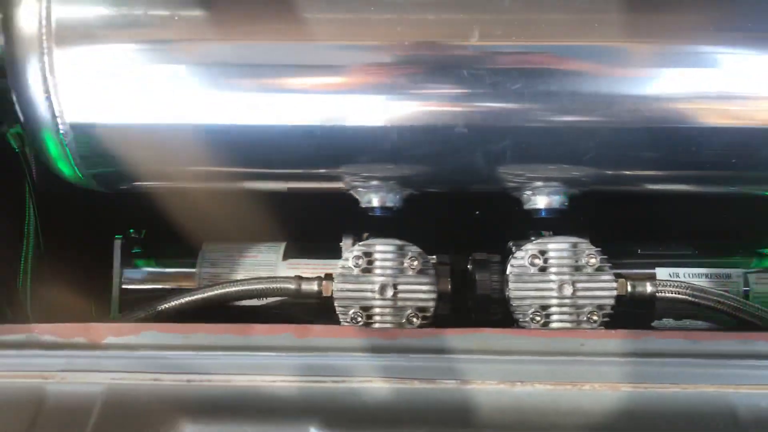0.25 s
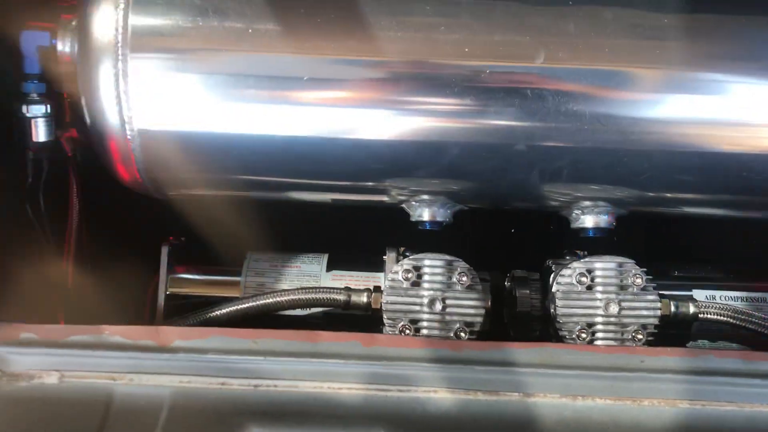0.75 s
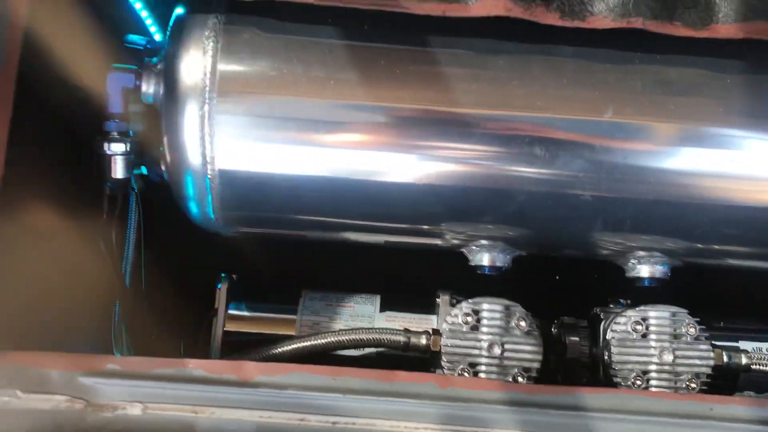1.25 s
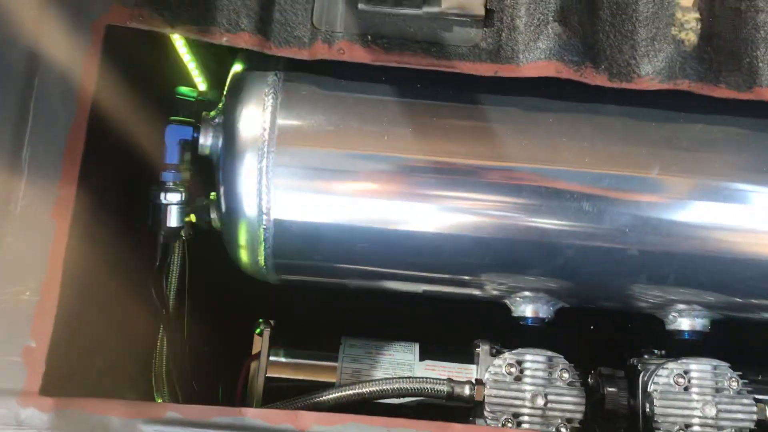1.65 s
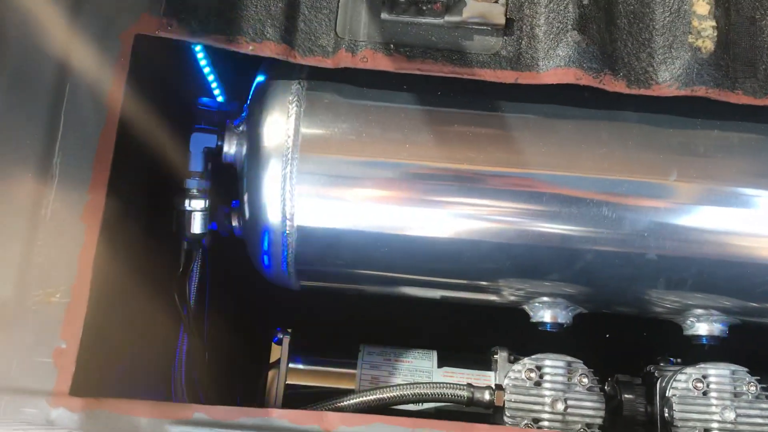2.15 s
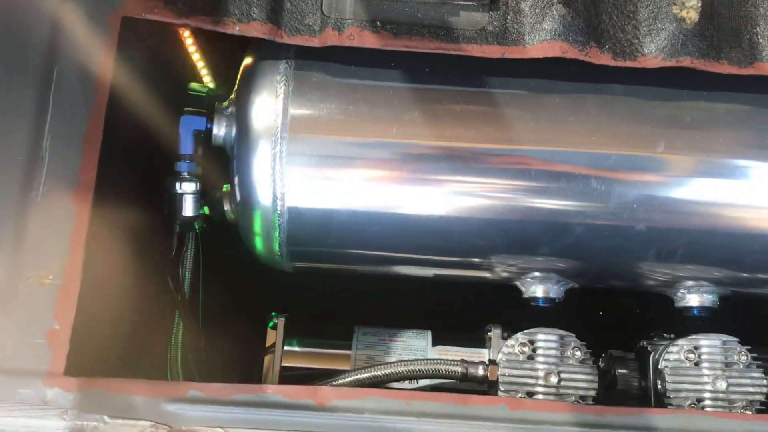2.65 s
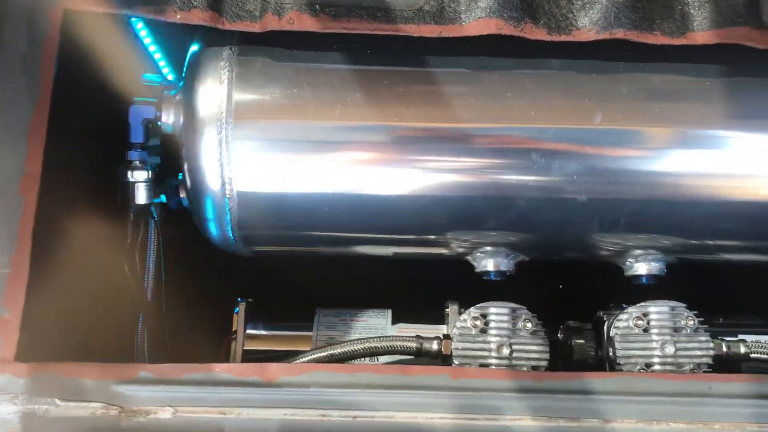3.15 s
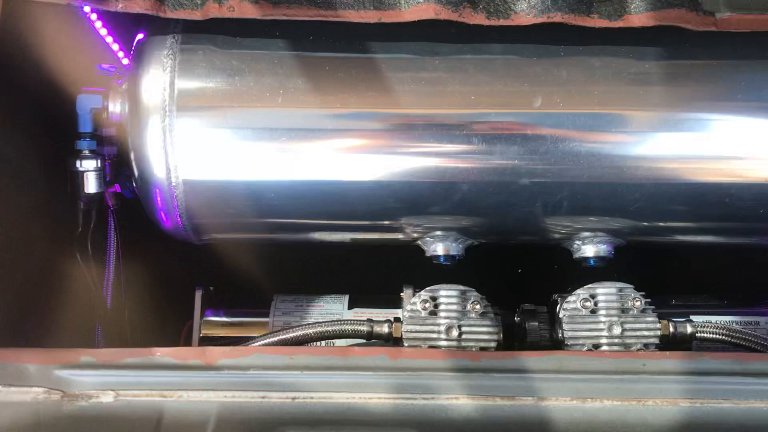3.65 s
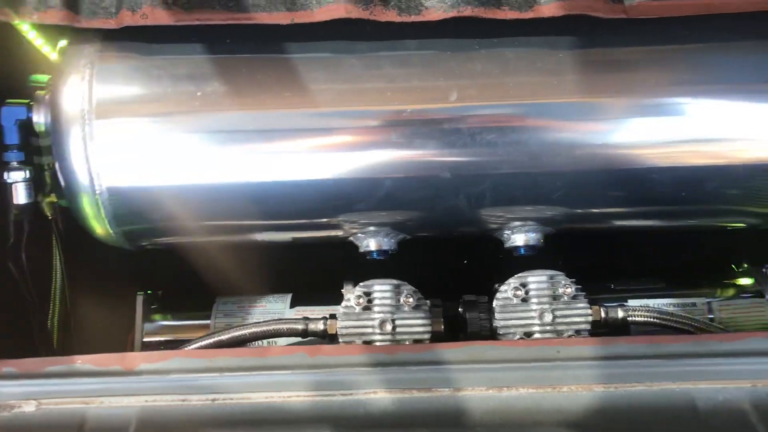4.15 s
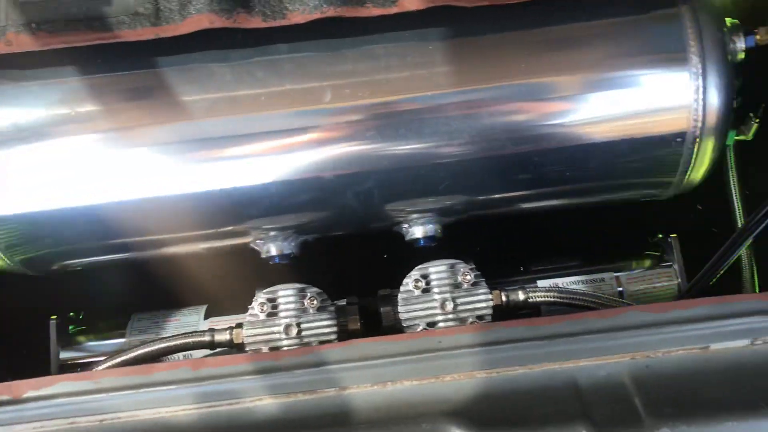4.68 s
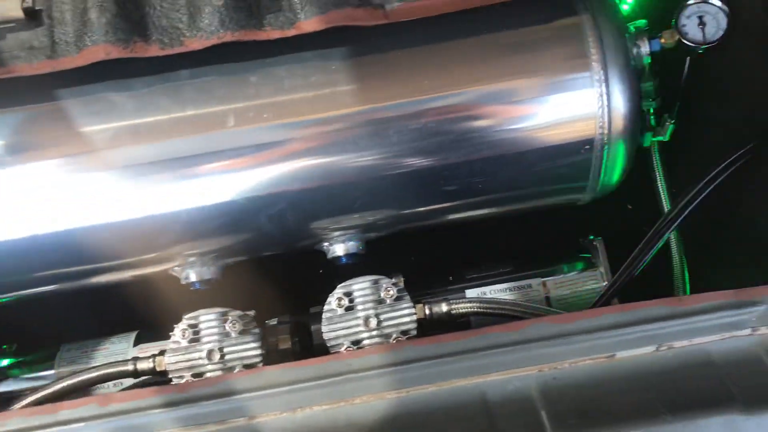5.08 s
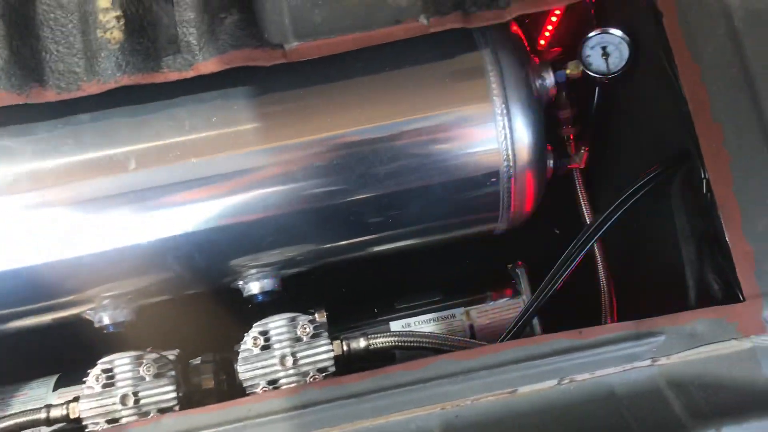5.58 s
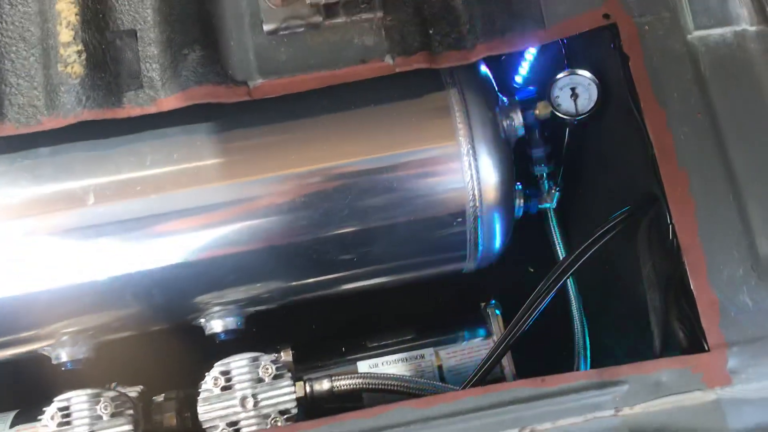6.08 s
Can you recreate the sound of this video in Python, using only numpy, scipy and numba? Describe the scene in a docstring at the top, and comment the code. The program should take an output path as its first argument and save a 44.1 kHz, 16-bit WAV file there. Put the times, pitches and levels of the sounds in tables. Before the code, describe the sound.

From 0 to about 6.3 seconds two small piston air compressors run continuously side by side in a steel well beneath a metal tank, heard closely by a hand-held microphone. A dense low hum around 110 hertz dominates, with lower and higher tones from both pumps; slightly different speeds, about 33 and 36 turns a second, make it throb and flutter several times a second. Fast knocks fuse into a hard mechanical rattle. Valve puffs and ticks add bright, metallic, ringing hiss, with thin motor and bearing whine and a loose-panel buzz. Between roughly 1 and 3 seconds some midrange tones swell slightly. Around 2.9 the bass shifts subtly, and from 3 to 4.5 the balance changes as the microphone moves to the other end. Tiny bright snaps occur near 2.2, 3.5, 4.9 and 5.0. The speed stays nearly constant and the pumps are still running at the end.

```python
"""Twin piston compressors

Two small piston air compressors run side by side in a steel well, filling a tank.
Each shaft repeats its knocks every turn, summed from sines at whole multiples of the turn rate.
Valves puff and tick as shaped noise ringing in the heads; motors and bearings whine on high orders.
The speeds differ slightly, so the hum throbs; a loose panel adds sum tones, a few valves snap.
The hand-held microphone drifts along the tank: levels shift, and single ranges swell and dip."""
import sys
import numpy as np
from numba import njit
from scipy import signal
from scipy.fft import rfft, irfft
from scipy.io import wavfile
from scipy.ndimage import uniform_filter1d

SR = 44100
rng = np.random.default_rng(int(sys.argv[2]) if len(sys.argv) > 2 else 0)


def to_wav(sig):
    """Store sig (one row per channel, or 1-D mono) as 16-bit WAV at the path in sys.argv[1].

    Samples outside -1..1 are clipped; the rate is SR.
    """
    pcm = np.clip(np.atleast_2d(sig), -1, 1) * 32767
    pcm = np.round(pcm).astype(np.int16)
    wavfile.write(sys.argv[1], SR, pcm.T)  # frames by channels


def voltage_ratio(decibels):
    """Convert decibels (scalar or array-like) to amplitude ratios, 20 dB per decade."""
    exponent = np.asarray(decibels, float) / 20
    return 10 ** exponent


N = 278702

# shaft speeds: time_s, slow_pump_rpm, fast_pump_rpm
SHAFT_SPEEDS = [(0, 1996.78, 2184.4), (1, 1998.37, 2183.69), (2, 1998.77, 2184.17), (2.8, 1997.04, 2184.66),
                (3.6, 1993.3, 2184.48), (4.4, 1992.6, 2184.41), (4.7, 1989.8, 2184.7),
                (5.4, 1991.6, 2185.66), (6.32, 1992.4, 2186.79)]
# lower shaft orders 1, 2, 3 .. at either end of the tank, before swells: left_db_rms, right_db_rms
SLOW_LOW_ORDERS = [(-48, -51), (-25.5, -27), (-35, -37.5), (-30, -27), (-37, -41), (-32.5, -31),
                   (-30, -30.5), (-34, -29), (-45.5, -44), (-46.5, -47), (-41.5, -47.5), (-38, -41),
                   (-34, -33.5), (-35.5, -33.5), (-45, -38.5), (-40.5, -40.5), (-42.5, -44), (-38.5, -47),
                   (-40, -49), (-55, -51.5), (-47, -50), (-48, -53), (-41, -56), (-47, -50.5), (-56.5, -47),
                   (-44, -49), (-69, -63), (-48, -62), (-48.5, -48), (-41, -51), (-60, -45.5), (-49, -46.5),
                   (-45.5, -52.5), (-52.5, -54), (-64, -47), (-42, -36), (-46.5, -66)]
FAST_LOW_ORDERS = [(-42, -43), (-36, -35.5), (-14.5, -16.5), (-44, -47.5), (-45, -39), (-26, -27.5),
                   (-33.5, -35), (-35.5, -36.5), (-39, -40.5), (-47.5, -61.5), (-43.5, -43), (-39, -36.5),
                   (-43, -40), (-35, -33), (-56.5, -46), (-46, -42.5), (-52, -54), (-43, -39.5), (-68, -61),
                   (-44, -47.5), (-40.5, -43), (-43, -45), (-42, -46.5), (-53, -45), (-63, -55.5),
                   (-42.5, -44.5), (-41.5, -50), (-45.5, -44)]
# slope of the weak upper orders, one table a pump: order, left_db_rms, right_db_rms
UPPER_SLOPES = [
    [(38, -61, -62), (50, -60, -58), (58, -62, -62), (70, -68, -68)],
    [(29, -54, -55), (39, -54, -52), (40, -62, -60), (48, -61, -53), (56, -63, -58), (70, -63, -64)],
]
UPPER_SPREAD_DB = 2.5  # order to order
# upper orders that fall on a resonance, one table a pump: order, left_db_rms, right_db_rms
RESONANT_ORDERS = [
    [(41, -47, -60), (46, -55, -57), (47, -55, -57), (48, -56, -53), (66, -60, -51), (67, -47, -49),
     (68, -60, -48)],
    [(37, -50, -48), (43, -55, -51), (44, -51, -49), (45, -52, -47), (47, -56, -49), (57, -47, -48),
     (61, -57, -52), (62, -54, -48)],
]
# where in the turn each range is struck: freq_hz, place_turns
SLOW_KNOCKS = [(60, .16), (110, .129), (170, .008), (240, .032), (290, .063), (400, .891), (470, .619),
               (600, .574), (800, .855), (1000, .619), (1200, .386), (1500, .543), (1900, .529)]
FAST_KNOCKS = [(60, .042), (110, .297), (190, .572), (260, .609), (370, .625), (450, .95), (520, .91),
               (700, .405), (850, .363), (1000, .431), (1300, .586), (1550, .437), (1800, .334),
               (2200, .403)]
SCATTER_RAD, SCATTER_HZ = .3, (530, 2400)  # echoes in the well smear the knocks in this range
# orders of nearly equal pitch that beat: slow_order, fast_order, in_step_s
BEATING_PAIRS = [(23, 21, .43), (68, 62, 5.93)]
# microphone along the tank: time_s, place (0 left end, 1 right end)
MIC_PLACES = [(0, 0.059), (1.5, .0), (2.6, 0), (3.4, 0.26), (4.2, 0.9), (4.8, 1), (6.32, 1.)]
# passing swells and dips of single ranges, mostly as the microphone moves past tank and walls; # the rows at
# 765 Hz only shape the level of the beat between slow order 23 and fast order 21 there: # start_s, end_s,
# centre_hz, half_width_hz, level_db (an end before the start reverses the sign)
RANGE_SWELLS = [(0.3, .15, 6000, 8000, 0.5), (0.1, 1.14, 765, 18, 2), (.62, .95, 2235, 30, 5),
                (1, 2.55, 1343, 12, 3.5), (1.85, 2.02, 3506, 52, 9), (1.9, 3.2, 8000, 3900, -0.5),
                (2.5, 3.5, 2247, 55, 5.5), (2.5, 4.3, 765, 20, 5), (2.9, 4.0, 109, 65, -0.7),
                (2.9, 4.0, 1610, 290, 3), (2.5, 3.35, 1040, 80, 3), (3.5, 4.0, 1196, 20, 5),
                (4.5, 4.4, 3530, 60, -6), (4.2, 5.1, 2220, 70, -2.5), (4.1, 6.4, 1540, 160, 1),
                (4, 4.6, 765, 18, 3), (4.5, 5.1, 10000, 4600, 1), (4.4, 4.75, 2075, 18, 6),
                (5.15, 5.65, 3670, 52, 6), (5, 6.4, 1040, 80, 1), (5.3, 6.4, 300, 62, 1),
                (5.5, 6.4, 2240, 60, 2), (6, 6.1, 2258, 30, 2.5)]
SWELL_EDGE_S = 0.038  # rise and fall
PATCH_DB = 1.3  # rms; reflections drift through the hiss as the microphone moves

BUZZ_DB, BUZZ_HZ = -8, 140  # loose panel: gain on the squared hum, lowest tone radiated
# motor and bearing whines, one table a pump: shaft_order, mean_level_db_rms
WHINE_ORDERS = [
    [(83, -69), (86, -65), (93, -68), (106, -60), (107, -63), (109, -68), (115, -70), (136, -74),
     (149, -67), (161, -73)],
    [(74, -68), (82, -64), (85, -67), (95, -66), (96, -62), (97, -60), (98, -68), (100, -69), (103, -62),
     (104, -66), (105, -61), (122, -72), (123, -72), (124, -71), (135, -71), (153, -65), (154, -69),
     (156, -67), (158, -68), (187, -70)],
]
WANDER_DB = 3  # rms wavering of the whines

# unsteady rumble of the frame, relative spectrum: freq_hz, level_db_per_hz
RUMBLE_SPECTRUM = [(25, -20), (60, -12), (110, -8), (230, -3), (340, -15), (500, -14), (700, -16),
                   (1000, -12), (1400, -18), (2300, -20), (3200, -30), (16000, -60)]
RUMBLE_DB, AIR_DB = -36, -41  # rms before swells and patches
# air through the valves, relative spectrum: freq_hz, level_db_per_hz
AIR_SPECTRUM = [(600, -8), (1500, -30.5), (2300, -4), (3000, -5.5), (4500, -7.5), (7500, -9.5),
                (10500, -17.5), (15500, -20), (20000, -42)]
# rings of heads and fittings: centre_hz, width_hz, over_air_db
HEAD_RINGS = [(2255, 140, 6), (3100, 120, 3), (3530, 79, 7.5), (3780, 68, 5), (4600, 280, -1),
              (4850, 49, 12), (4840, 74, -10), (5720, 620, 7.5), (6960, 153, -11), (6926, 315, 14),
              (7880, 500, -1.5), (8290, 170, 6), (8970, 180, 7), (9790, 150, 6), (10450, 200, -3),
              (11600, 250, 4.5), (12300, 150, 2), (13400, 250, 3), (14150, 150, -1)]
# valve puff, one row a pump; levels relative:
# opening_turns, puff_db, decay_turns, stroke_spread_db, tick_db
VALVE_PUFFS = [(0.68, -4, 0.54, 4.5, -4), (.36, 5.5, 0.42, 1.7, 5)]
LEAK_DB = 3  # steady air noise, on the scale of the puffs
REPEAT = .3  # power share of each puff that carries over from stroke to stroke

# hard valve snaps: time_s, peak_db
VALVE_SNAPS = [(2.1806, -40), (3.526, -36), (4.873, -36), (4.9004, -36), (5.0117, -35), (5.0381, -31)]
SNAP_HZ, SNAP_DECAY_S = 11500, .0012

SLIP_S, SLIP_RAD, SLIP_HZ = 2.9, .7, 680  # the bass slips back in phase: time, lag, upper edge


def read(points, hz):
    """Joins (Hz, value) points on a log-frequency axis."""
    f, value = np.transpose(points)
    return np.interp(np.log(hz + 1), np.log(f + 1), value)


def evened(x):
    """Scales to rms 1."""
    return x / np.sqrt(np.mean(x ** 2))


def drift(count, length, span):
    """Slow smooth chance, overall rms 1: count rows of this length."""
    rough = rng.standard_normal((length + 2 * span, count)).T
    smooth = uniform_filter1d(uniform_filter1d(rough, span), span)
    return evened(smooth[:, span:-span])


def causal(db):
    """Complex response of a struck body: the phase follows from the log gain."""
    log_gain = np.log(voltage_ratio(np.r_[db, db[-2:0:-1]]))
    return np.conj(np.exp(signal.hilbert(log_gain)))[:len(db)]


def colour(x, db_of_hz):
    """Passes x through a causal body."""
    taps = irfft(causal(db_of_hz(np.fft.rfftfreq(8192, 1 / SR))))
    return signal.oaconvolve(x, taps[:4096])[:N]


def swell_db(hz, t):
    """Summed level change of the passing swells: array hz x t."""
    total = 0
    for start_s, end_s, centre_hz, half_width_hz, db in RANGE_SWELLS:
        in_range = np.exp(-((hz[:, None] - centre_hz) / half_width_hz) ** 2)
        lasting = np.tanh((t - start_s) / SWELL_EDGE_S) - np.tanh((t - end_s) / SWELL_EDGE_S)
        total = total + db * in_range * lasting / 2
    return total


def shaft_turns():
    """Turns made by each crank: the running sum of its speed."""
    s, *rpm = np.transpose(SHAFT_SPEEDS)
    t = np.arange(N) / SR
    return [np.cumsum(np.interp(t, s, r)) / (60 * SR) for r in rpm]


@njit(fastmath=True)
def locked_sines(turns, order, gain, phase, hop):
    """Sums cosines at multiples of the shaft, each gain joined linearly between frames."""
    out, start = np.zeros(len(turns)), np.exp(1j * phase)
    for n in range(len(turns)):
        frame, part = n // hop, (n % hop) / hop
        step, spin, reached = np.exp(2j * np.pi * turns[n]), 1 + 0j, 0
        for k in range(len(order)):
            while reached < order[k]:  # each further order turns once more
                spin, reached = spin * step, reached + 1
            level = gain[frame, k] + part * (gain[frame + 1, k] - gain[frame, k])
            out[n] += level * (spin * start[k]).real
    return out


def orders(turns, order, db, phase):
    """Shaft orders as heard in the well; db holds a level for each order every 512 samples."""
    hz = order * turns[-1] * SR / N
    t = np.arange(db.shape[1]) * 512 / SR
    gain = np.sqrt(2) * voltage_ratio(db + swell_db(hz, t))  # rms to peak
    return locked_sines(turns, order * 1., np.ascontiguousarray(gain.T), phase, 512)


def all_orders(low, upper, strong):
    """Left and right levels of every order: low ones, scattered slope, resonant peaks."""
    at, *ends = np.transpose(upper)
    order = np.arange(len(low) + 1, int(at[-1]) + 1)
    slope = np.transpose([np.interp(order, at, db) for db in ends])
    high = slope + UPPER_SPREAD_DB * rng.standard_normal((len(order), 2))
    table = np.r_[low, high]
    table[[row[0] - 1 for row in strong]] = [row[1:] for row in strong]
    return table


def pump(turns, table, knock, which):
    """The knocks of one turn: each range of orders is struck at its own place in the turn."""
    left, right = np.transpose(table)
    order = np.arange(1, len(table) + 1)
    hz = order * turns[-1] * SR / N
    smeared = (hz > SCATTER_HZ[0]) * (hz < SCATTER_HZ[1])
    smear = SCATTER_RAD * rng.standard_normal(len(hz)) * smeared
    phase = smear - 2 * np.pi * np.cumsum(read(knock, hz))  # phase slope over orders = delay
    for *pair, s in BEATING_PAIRS:
        phase[pair[which] - 1] = -2 * np.pi * pair[which] * turns[round(s * SR)]
    t = np.arange(N // 512 + 2) * 512 / SR
    place = np.clip(np.interp(t, *np.transpose(MIC_PLACES)), 0, 1)
    db = left[:, None] + (right - left)[:, None] * place
    return orders(turns, order, db, phase)


def panel_buzz(hum):
    """A loose panel moves unevenly both ways: squaring gives sum tones of the two pumps."""
    radiated = signal.butter(4, BUZZ_HZ, "high", fs=SR, output="sos")
    return voltage_ratio(BUZZ_DB) * signal.sosfilt(radiated, hum ** 2)


def whine(turns, table):
    """Motor and bearing whine: high shaft orders that each waver on their own."""
    order, db = np.transpose(table)
    waver = drift(count=len(table), length=N // 512 + 2, span=14)
    phase = 2 * np.pi * rng.random(len(table))
    return orders(turns, np.round(order), db[:, None] + WANDER_DB * waver, phase)


def rumble():
    """No two strokes are alike: noise in the frame between the orders."""
    noise = colour(rng.standard_normal(N), lambda hz: read(RUMBLE_SPECTRUM, hz))
    return voltage_ratio(RUMBLE_DB) * evened(noise)


def heads_db(hz):
    """Air spectrum raised or lowered at each ring of heads and fittings."""
    return read(AIR_SPECTRUM, hz) + sum(db / (1 + (2 * (hz - f) / w) ** 2) for f, w, db in HEAD_RINGS)


def valves(all_turns):
    """Each valve opens with a tick and a dying puff of air; both ring in the heads."""
    air = voltage_ratio(LEAK_DB) * rng.standard_normal(N)
    for turns, (at, db, decay, spread_db, tick_db) in zip(all_turns, VALVE_PUFFS):
        stroke, since = np.divmod(turns - at + 1, 1)  # since: turns from opening
        stroke = stroke.astype(int)
        strokes = stroke[-1] + 1
        puff, tick = np.clip(rng.standard_normal((strokes, 2)), -2, 2)[stroke].T
        flow = voltage_ratio(db + spread_db * puff) * np.exp(-(since / decay) ** 2) * np.tanh(since / 0.011)
        flow += voltage_ratio(tick_db + 4.5 * tick) * np.exp(-since / 0.033)
        size = int(N / turns[-1])  # samples a turn
        # the rattle of the reed changes over a dozen strokes
        habit = drift(count=size, length=strokes, span=12)
        same = habit[(since * size).astype(int), stroke]
        fresh = rng.standard_normal(N)
        air += flow * (np.sqrt(REPEAT) * same + np.sqrt(1 - REPEAT) * fresh)
    return voltage_ratio(AIR_DB) * evened(colour(air, heads_db))


def heard_in_well(noise):
    """The same swells colour the noises, with drifting patches of reflection."""
    hz, t, z = signal.stft(noise, SR, nperseg=1024)
    patches = drift(count=len(hz), length=len(t), span=12)
    patches = evened(uniform_filter1d(patches, 7, 0))  # neighbouring bins move together
    z = z * voltage_ratio(swell_db(hz, t) + PATCH_DB * patches)
    return signal.istft(z, SR, nperseg=1024)[1][:N]


def snaps():
    """Now and then a valve shuts hard: a very short bright burst."""
    out, t = np.zeros(N + 400), np.arange(400) / SR
    band = signal.butter(2, [SNAP_HZ / 1.35, SNAP_HZ * 1.3], "band", fs=SR)
    for s, db in VALVE_SNAPS:
        noise = rng.standard_normal(400)
        burst = signal.lfilter(*band, noise * np.exp(-t / SNAP_DECAY_S))
        out[round(s * SR):][:400] += voltage_ratio(db) * burst / abs(burst).max()
    return out[:N]


def bass_slip(x):
    """The bass phase steps back once and stays: a 12 ms crossfade to a phase-lagged copy."""
    hz = np.fft.rfftfreq(N, 1 / SR)
    lag_rad = SLIP_RAD / (1 + (hz / SLIP_HZ) ** 4)
    late = irfft(rfft(x) * np.exp(-1j * lag_rad), N)
    share = np.clip((np.arange(N) / SR - SLIP_S) / 0.012 + .5, 0, 1)
    return (1 - share) * x + share * late


def scene():
    """Both pumps, their noises and the panel."""
    slow, fast = shaft_turns()
    slow_levels = all_orders(SLOW_LOW_ORDERS, UPPER_SLOPES[0], RESONANT_ORDERS[0])
    fast_levels = all_orders(FAST_LOW_ORDERS, UPPER_SLOPES[1], RESONANT_ORDERS[1])
    hum = pump(slow, slow_levels, SLOW_KNOCKS, which=0)
    hum = hum + pump(fast, fast_levels, FAST_KNOCKS, which=1)
    whines = whine(slow, WHINE_ORDERS[0]) + whine(fast, WHINE_ORDERS[1])
    noises = heard_in_well(rumble() + valves([slow, fast]))
    return (hum + panel_buzz(hum) + whines + noises + snaps())[None]


def roll_off(x):
    """The treble ends steeply here."""
    return signal.sosfilt(signal.butter(12, 15710, fs=SR, output="sos"), x)


def record(dry):
    """The finished mix, with the slip in the bass."""
    mix = bass_slip(dry)
    return roll_off(mix)


dry = scene()
out = record(dry)
to_wav(out)
```